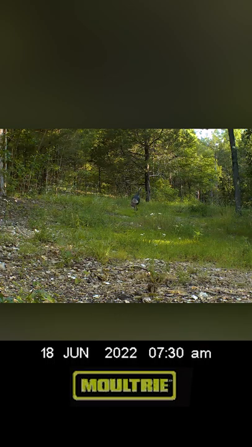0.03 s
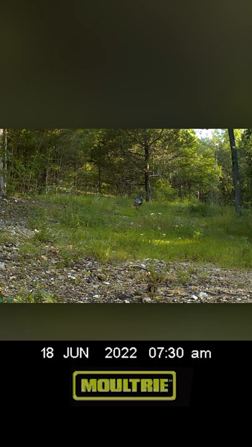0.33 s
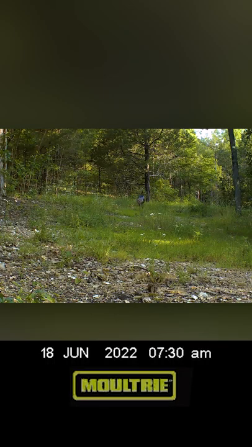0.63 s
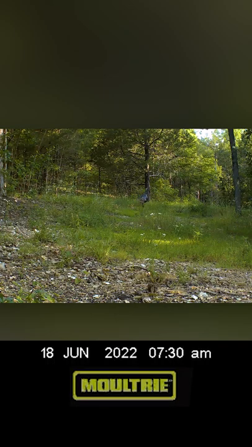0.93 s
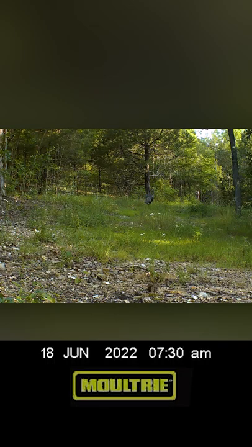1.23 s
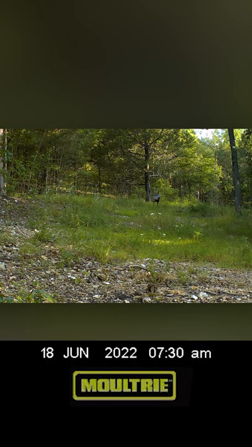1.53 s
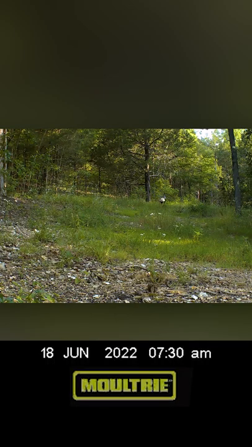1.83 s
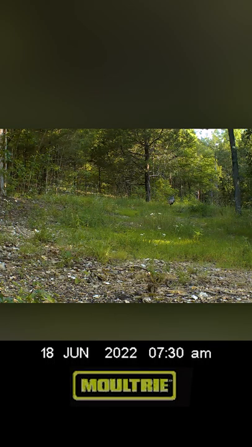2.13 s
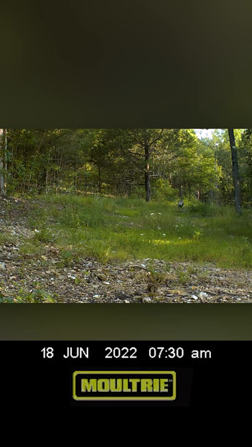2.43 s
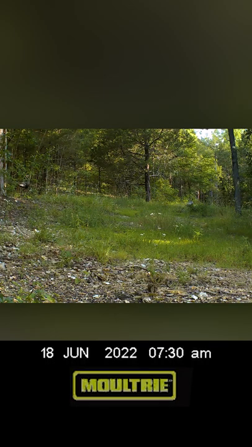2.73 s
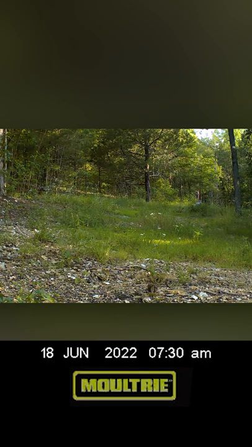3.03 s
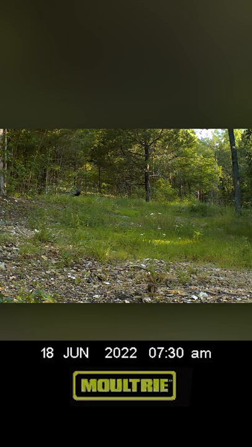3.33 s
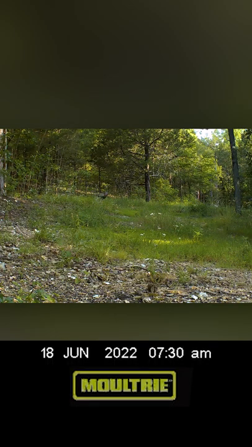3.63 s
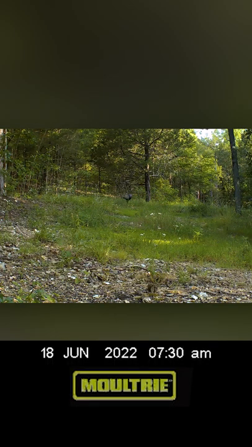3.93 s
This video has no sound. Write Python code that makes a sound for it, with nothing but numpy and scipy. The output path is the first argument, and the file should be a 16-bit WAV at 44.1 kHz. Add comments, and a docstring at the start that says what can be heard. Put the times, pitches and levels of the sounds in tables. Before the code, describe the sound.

Close, high cricket chirps repeat over faint birds, one falling whistle and a far thud.

```python
"""A cricket chirps close on the right of a morning forest clearing, scraping wing over wing in short runs.
Other crickets answer farther off, insects tick in bouts and a katydid's wings buzz thinly.
A bird on the left gives one long falling whistle that hangs in the trees; small birds slur and buzz.
One distant boom rolls back from the woods, over a faint far whine, a low drone and a bed of rumbling air."""
import sys
import numpy as np
from scipy import signal
from scipy.fft import rfft, irfft, next_fast_len
from scipy.io import wavfile
from scipy.ndimage import map_coordinates

SR = 44100
rng = np.random.default_rng(int(sys.argv[2]) if len(sys.argv) > 2 else 0)


def master(y):
    """Save y as 16-bit WAV."""
    cut = np.clip(np.atleast_2d(y).T, -1, 1)
    pcm = np.round(cut * 32767)  # scale
    wavfile.write(sys.argv[1], SR, pcm.astype(np.int16))


N = 176400

STROKE_GAP_S, RASP_RATE_HZ = .00854, 1200  # all crickets: stroke spacing, pace of the roughness


def near_cricket():
    """Ringing wings close on the right, with friction noise, a few scratches and short reflections."""
    # chirps (start [s], strokes [count], swell to full strength [strokes], level [dB])
    chirps = [(.2152, 7, 1, -26.3), (.5767, 8, 1, -24.1), (.9334, 7, 1, -24.5), (1.2588, 8, 2, -26.5),
              (1.573, 8, 1, -26.6), (1.9078, 8, 1, -25.3), (2.738, 7, 1, -25.4), (3.075, 8, 2, -26.2),
              (3.4325, 8, 1, -25.7), (3.7526, 8, 2, -25.2)]
    # the wings catch as a chirp ends (time [s], level [dB])
    scratches = [(.977, -58), (.985, -43), (2.787, -46)]
    # colour of the wing friction (frequency [Hz], level [dB])
    scrape = [(3000, -32), (6500, -25), (8000, 9), (9700, 9.5), (10700, -11), (11500, 1.5), (13000, -4),
              (15500, -23)]
    # a notch that dulls the ring on the left (frequency [Hz], gain [dB])
    left_notch = [(7000, 2), (7900, 1), (8500, -6), (9000, 0), (10000, 0)]
    song, scratch = np.zeros(N), np.zeros(N)
    for s, count, swell, db in chirps:
        add_chirp(song, s, int(round(count)), swell, db)
    for s, db in scratches:
        add(scratch, s, amp(db) * arch(clock(.008)))
    envelope = np.abs(signal.hilbert(song))
    friction = amp(-31 + 5.2 * wobble(150)) * envelope + scratch
    left, right = song * amp([[-19], [0]]) + amp(-18.5) * scatter(song, t60=.022)
    left = filtered(left, lambda hz: amp(along(left_notch, hz)))
    return np.array([left, right]) + friction * rush(scrape) * pan(db=-8.5) + amp(-33) * woods(song)


def add_chirp(track, s, count, swell, db):
    """A light touch of the wings, then a run of strokes that swells; softer strokes ring flat."""
    wing_hz, flat_hz_per_db = 8570, 42
    first_db, last_db = -5.5, -2
    touch = wing_stroke(wing_hz - 250, db - 13, stretch=.52)
    add(track, s - .0065, touch)
    for k in range(count):
        accent_db = first_db * max(0, 1 - k / swell) + last_db * (k == count - 1) + rng.normal(0, .6)
        stretch = np.clip(rng.normal(1, .11), .5, 2)
        start = s + k * STROKE_GAP_S + rng.normal(0, .00017)
        add(track, start, wing_stroke(wing_hz + flat_hz_per_db * accent_db, db + accent_db, stretch))


def wing_stroke(hz, db, stretch):
    """The scraper runs along the file: the wing rings cleanly, then sags and stutters as it slows."""
    # shape of one stroke (time [s], amplitude [share], pitch offset [Hz])
    shape = [(0, 0, 400), (.0005, .55, 170), (.0019, 1, 70), (.0035, .94, -40), (.0049, .6, -220),
             (.0058, .08, -440), (.0066, .26, -480), (.0081, .03, -400)]
    t = clock(shape[-1][0] * stretch)
    envelope, offset_hz = curves(shape, t / stretch)
    looseness = 1 + 3.5 * (t / t[-1]) ** 2
    slip_hz = 45 * looseness * wobble(RASP_RATE_HZ, len(t)) + rng.normal(0, 50)
    rasp = 1 + .05 * looseness * wobble(RASP_RATE_HZ, len(t))
    return amp(db) * envelope * rasp * tone(hz + offset_hz + slip_hz) / np.sqrt(2)


def far_crickets():
    """Far chirps arch in pitch and level, blurred by the grass; many more blend into a chorus."""
    # answering crickets (pitch [Hz], level [dB], chirp starts [s])
    crickets = [(9440, -58.5, [.24, .615, .975, 1.345, 1.67, 2.016, 2.515, 2.83, 3.24, 3.58, 3.945]),
                (9050, -60.5, [0.001, .34, 0.679, 1.04, 1.39, 1.725, 2.06, 2.43, 2.6, 3, 3.34, 3.835]),
                (8920, -61, [.1, .52, 1.08, 1.48, 1.81, 2.21, 2.32, 2.67, 3.53, 3.9])]
    chorus_gap_s, chorus_db, arch_hz = .05, -63, 260
    song, t = np.zeros(N), clock(.08)
    chirps = [(s, hz, db) for hz, db, starts in crickets for s in starts]
    for s in np.arange(0, N / SR, chorus_gap_s):
        chirps.append((s + rng.normal(0, chorus_gap_s / 2), rng.normal(8600, 260), chorus_db))
    for s, hz, db in chirps:
        strokes = 1 + .5 * np.cos(2 * np.pi * (t / STROKE_GAP_S + rng.random()))
        pitch = hz - arch_hz * (2 * t / t[-1] - 1) ** 2 + 170 * wobble(RASP_RATE_HZ / 2, len(t))
        add(song, s, amp(db + rng.normal(0, 1)) * arch(t) * strokes * tone(pitch))
    return scatter(song, t60=.016) * pan(db=-2.5)


def ticking_insects():
    """Insects repeat one short sagging note in bouts."""
    # bouts (start [s], end [s], tick spacing [s], pitch [Hz], level [dB], left over right [dB])
    bouts = [(0, .41, 0.057, 7720, -67, 0), (1.023, 1.17, .023, 7500, -65, -3),
             (1.439, 2.36, 0.059, 7690, -65, -1), (2.912, 4, .0535, 7618, -64.5, 0),
             (3.501, 3.905, 0.024, 7920, -59, -5)]
    song, t = np.zeros((2, N)), clock(.0225)
    sag_hz = 415 * (1.35 * t / t[-1] - .5) ** 2
    for start, end, spacing, hz, db, side_db in bouts:
        for s in np.arange(start, end, spacing):
            pitch = hz - sag_hz + 80 * wobble(680, len(t))
            onset = s + rng.normal(0, .002)
            tick = amp(db + rng.normal(0, 3.5)) * arch(t) ** 2 * tone(pitch)
            add(song, onset, tick * pan(side_db))
    return song + scatter(song.mean(0), t60=.066)


def katydid():
    """A very high, thin buzz: one sharp click for each wing closing and a softer scrape between."""
    # colour of the buzz (frequency [Hz], level [dB])
    spectrum = [(6000, -22), (11000, -20), (14500, 5), (15500, 9), (15900, -15)]
    # its swells and dips (time [s], relative level [dB])
    swells = [(0, -24), (.33, -8), (.55, 1), (.98, -1), (1.03, -20), (1.13, -19), (1.18, -7), (1.43, -10),
              (1.49, 0.5), (4, -0.5)]
    wing_rate_hz, click_s, backstroke = 46.8, .0035, .3
    swell_db, = curves(swells, np.arange(N) / SR)
    closings = np.cumsum(wing_rate_hz + .5 * wobble(3)) / SR
    since_closing = closings % 1 / wing_rate_hz
    wings = unit(backstroke + np.exp(-since_closing / click_s))
    return amp(-65.5 + swell_db + wobble(40)) * wings * rush(spectrum) * pan(db=-1.5)


def whistling_bird():
    """A whistle dives roughly, levels out to a pure tone, returns from the tree line and flutters away."""
    # contour of the whistle (time [s], pitch [Hz], level [dB])
    contour = [(.755, 6600, -72), (.78, 5580, -50), (0.796, 5190, -53), (0.799, 4960, -41),
               (0.82, 4580, -38), (0.85, 4470, -39), (.864, 4460, -58), (0.878, 4350, -38),
               (0.889, 4310, -52), (0.923, 4235, -40.5), (0.965, 4166, -34.5), (1.004, 4075, -35.5),
               (1.069, 4090, -37.5), (1.088, 4102, -47)]
    tree_line_s, flutter_db = .35, 2
    t = np.arange(N) / SR
    hz, db = curves(contour, t)
    height_hz = np.abs(hz - hz[-1])
    hz = hz + (7 + .057 * height_hz) * wobble(400)  # roughest at the top of the dive
    envelope = amp(db + .94 * wobble(70.1)) * gate(contour, t, fade_s=.0024)
    song = envelope * (tone(hz) + amp(-26) * tone(2 * hz) + amp(-32) * tone(3 * hz))
    send_db = np.minimum(height_hz / 100, 3)
    blurred = envelope * amp(send_db) * tone(hz + 60 * wobble(600))  # the foliage blurs the echo
    echo = amp(-18) * woods(blurred)
    add(echo, tree_line_s, amp(-20.5) * scatter(blurred, t60=.2))
    return song * pan(db=8) + echo * amp(flutter_db * wobble(35))


def small_birds():
    """Hoarse slurs that round over and fall, thin far notes and buzzy calls, echoing in the trees."""
    # slurs (start [s], length [s], top [Hz], end [Hz], level [dB], left over right [dB])
    slur_calls = [(0.058, 0.048, 3980, 3440, -61.5, 8), (0.147, 0.031, 3750, 2660, -61.5, 3),
                  (0.195, 0.062, 5230, 3080, -54, 10), (0.318, 0.046, 4600, 3050, -56.5, 11),
                  (1.119, 0.029, 4000, 3370, -64, 21), (1.256, 0.077, 5200, 3056, -56, 10),
                  (1.399, 0.045, 4150, 2924, -59.5, 8), (2.15, 0.046, 4120, 2550, -56.5, 1),
                  (2.666, .035, 4360, 3620, -58, 6), (2.769, 0.081, 4130, 2940, -56.5, 8),
                  (2.915, 0.084, 4200, 2910, -58.5, 10), (3.263, 0.045, 4190, 2430, -55, 3),
                  (3.3, 0.029, 3200, 2310, -57, 1)]
    # pitch path at even steps through a slur (fall [share])
    slur_fall = [0.044, 0, 0.15, 0.43, .73, 1]
    # thin far notes (start [s], length [s], start pitch [Hz], end pitch [Hz], level [dB])
    far_notes = [(2.08, 0.2, 2540, 2500, -65), (3.626, 0.0093, 2507, 1880, -56.5)]
    # buzzy calls (start [s], length [s], start pitch [Hz], end pitch [Hz], level [dB])
    buzz_calls = [(1.235, .028, 6000, 6180, -61), (1.33, 0.078, 6400, 5950, -55),
                  (1.385, 0.07, 6050, 5400, -59)]
    buzz_rate_hz, buzz_swing_hz = 100, 270
    slurs, notes, buzzes = np.zeros((2, N)), np.zeros(N), np.zeros(N)
    for s, length, top, end, db, side_db in slur_calls:
        t = clock(length)
        step = t / t[-1] * (len(slur_fall) - 1)
        fall = map_coordinates(np.array(slur_fall, float), [step], mode="nearest")
        pitch = top + (end - top) * fall + 85 * wobble(700, len(t))
        envelope = amp(db + 2.2 * wobble(350, len(t))) * arch(t)
        add(slurs, s, envelope * tone(pitch) * pan(side_db))
    for s, length, start, end, db in far_notes:
        t = clock(length)
        pitch = np.linspace(start, end, len(t)) + 25 * wobble(148.9, len(t))
        add(notes, s, amp(db) * arch(t) * tone(pitch))
    for s, length, start, end, db in buzz_calls:
        t = clock(length)
        swing = buzz_swing_hz * (np.sin(2 * np.pi * buzz_rate_hz * t) + .54 * wobble(594, len(t)))
        add(buzzes, s, amp(db) * arch(t) * tone(np.linspace(start, end, len(t)) + swing))
    calls = slurs + amp(-10) * scatter(slurs.mean(0), t60=.24) + notes * pan(db=15)
    calls += (amp(1) * buzzes + scatter(buzzes, t60=.06)) * pan(db=9)
    return calls + amp(-11.5) * woods(slurs.mean(0) + notes + buzzes)


def boom():
    """A distant low thud with a hollow ring, then its rolling returns from the woods."""
    # hollow ring of the thud (pitch [Hz], level [dB], t60 [s])
    modes = [(200, -38.5, 0.782), (255, -44, 1)]
    # rolling returns (start [s], level [dB], rise [s], t60 [s])
    returns = [(2.18, -41.5, 0.023, 2.93), (2.68, -46, 0.13, 4.66)]
    # colour of the roll (frequency [Hz], level [dB])
    spectrum = [(40, -14), (110, -6.5), (210, 6), (320, -6.5), (600, -3), (900, -19), (1500, -25),
                (9000, -62)]
    start_s, thud_hz = 2.168, 39.9
    thud, t = np.zeros(N), clock(.092)
    add(thud, start_s, amp(-23.5) * np.sin(np.pi * t / t[-1]) * np.sin(2 * np.pi * thud_hz * t))
    t = np.arange(N) / SR
    age = np.maximum(t - start_s, 0)
    attack = 1 - np.exp(-age / .03)
    ring = attack * sum(amp(db - 60 * age / t60) * tone(hz + 5 * wobble(50)) for hz, db, t60 in modes)
    power = np.zeros(N)
    for s, db, rise, t60 in returns:
        decay = amp(db - 60 * np.maximum(t - s - rise, 0) / t60)
        power += (decay * np.clip((t - s) / rise, 0, 1)) ** 2
    roll = np.sqrt(power) * amp(1.2 * wobble(17)) * rush(spectrum)
    return thud * pan(db=7) + ring + roll * pan(db=-2.5)


def low_drone():
    """A deep wavering hum, left of centre."""
    # contour of the drone (time [s], pitch [Hz], level [dB])
    contour = [(0, 54.4, -34.5), (.42, 57.56, -40), (.9, 58.07, -39.5), (1.1, 68.05, -36),
               (1.33, 69.1, -37.5), (1.52, 61.9, -53), (1.75, 70.7, -37.5), (2.2, 62.02, -51),
               (2.7, 68.9, -40.5), (3.1, 67.96, -39), (3.35, 64.1, -45.5), (3.5, 56.1, -36.5),
               (3.65, 57.66, -46.5), (4, 61.9, -40)]
    hz, db = curves(contour, np.arange(N) / SR)
    return amp(db + .9 * wobble(14)) * tone(hz + 4 * wobble(25.16)) * pan(db=5.5)


def far_whine():
    """A faint tone glides down and up again, washed in the echo of the woods."""
    # contour of the whine (time [s], pitch [Hz], level [dB])
    contour = [(.7, 876, -70), (0.979, 770.8, -61.5), (1.42, 769.4, -65), (1.621, 750.6, -69),
               (2.05, 950, -65.5)]
    t = np.arange(N) / SR
    hz, db = curves(contour, t)
    whine = amp(db) * gate(contour, t, fade_s=.022) * tone(hz + 12 * wobble(50))
    return amp(2) * whine + amp(-.5) * woods(whine)


def air():
    """The bed: a low rumble and the soft rush of the woods, both gently swelling."""
    # colour of the rumble (frequency [Hz], level [dB])
    rumble_spectrum = [(15, 3.5), (30, -4.5), (52, -0.5), (80, -2.5), (115, -5.5), (160, -13), (600, -49.5)]
    # colour of the rush (frequency [Hz], level [dB])
    rush_spectrum = [(88, -64), (150, -5), (270, -9), (520, -13), (870, -14.5), (1150, -18.5),
                     (1600, -23.5), (2900, -27.5), (4000, -30.5), (6900, -36), (8200, -21.5), (10000, -50),
                     (15800, -90)]
    rumble = amp(-36.5 + .87 * wobble(6.29)) * rush(rumble_spectrum) * pan(db=2)
    return rumble + amp(-51.5 + .5 * wobble(2.49)) * rush(rush_spectrum) * pan(db=2.5)


def woods(x):
    """The long reverb of the trees, lingering most in the birds' range."""
    # decay of the woods (frequency [Hz], t60 [s])
    decay_times = [(300, 0.92), (4000, 2.5), (6500, 1.1), (15000, 0.36)]
    hz, t, noise = signal.stft(rng.standard_normal((2, 2 * SR)), SR, nperseg=256)
    decay = amp(-60 * t / along(decay_times, hz)[:, None])
    build_up = 1 - np.exp(-t / .017)
    tail = signal.istft(noise * decay * build_up, SR, nperseg=256)[1]
    return spread(reverberate(x, tail))


def scatter(x, t60):
    """Quick reflections from stones and grass, different on each side."""
    t = clock(.15)
    return reverberate(x, rng.standard_normal((2, len(t))) * amp(-60 * t / t60))


def reverberate(x, tail):
    """A mono sound through a stereo tail scaled to about unit energy."""
    return signal.fftconvolve(x[None], tail / np.linalg.norm(tail[0]), axes=1)[:, :N]


def rush(spectrum):
    """Diffuse stereo noise of rms 1."""
    noise = filtered(rng.standard_normal((2, N)), lambda hz: amp(along(spectrum, hz)))
    return unit(spread(noise))


def spread(pair):
    """Two unrelated signals become a diffuse field, narrow in the bass and wide in the treble."""
    # likeness of left and right (frequency [Hz], correlation [0-1])
    likeness = [(60, 0.69), (200, 0.8), (600, 0.72), (1300, 0.42), (4000, 0.57), (8000, 0.36),
                (15000, 0.042)]
    angle = lambda hz: np.arccos(np.clip(along(likeness, hz), -1, 1)) / 2
    mid, side = filtered(pair, lambda hz: np.array([np.cos(angle(hz)), np.sin(angle(hz))]))
    return np.array([mid + side, mid - side])


def filtered(x, response):
    """x shaped by a frequency response."""
    size = next_fast_len(N + SR // 2)
    return irfft(rfft(x, size) * response(np.fft.rfftfreq(size, 1 / SR)), size)[..., :N]


def tone(hz):
    """A sine of rms 1 that follows a pitch curve."""
    return np.sqrt(2) * np.sin(2 * np.pi * np.cumsum(hz) / SR)


def wobble(rate, size=N):
    """A smooth random curve, rate knots a second."""
    knots = rng.standard_normal(int(size * rate / SR) + 4)
    return map_coordinates(knots, [np.arange(size) * rate / SR])


def arch(t):
    """A soft swell and fade over the span of t."""
    edges = np.minimum(1, np.minimum(t, t[-1] - t) / t[-1] * 10)
    return np.sqrt(np.abs(np.sin(np.pi * t / t[-1]))) * edges


def gate(rows, t, fade_s):
    """Fades in from the first row's time and out by the last."""
    return np.clip(np.minimum(t - rows[0][0], rows[-1][0] - t) / fade_s, 0, 1)


def curves(rows, t):
    """Each column after the time, at the times t."""
    times, *columns = np.transpose(rows)
    return [np.interp(t, times, column) for column in columns]


def along(points, hz):
    """(frequency [Hz], value) points joined on a log axis."""
    freqs, values = np.transpose(points)
    return np.interp(np.log(hz + 1), np.log(freqs + 1), values)


def add(track, s, x):
    """Mix x in at s seconds."""
    i = int(np.clip(round(s * SR), 0, N))
    track[..., i:i + x.shape[-1]] += x[..., :N - i]


def pan(db):
    """Stereo gains, left over right by db."""
    return amp(np.array([[db], [-db]]) / 2)


def amp(db):
    return 10 ** (np.asarray(db) / 20)


def unit(x):
    return x / np.sqrt(np.mean(x ** 2) + 1e-20)


def clock(length):
    return np.arange(int(length * SR)) / SR


def scene():
    """Insects and birds over the far sounds of the forest."""
    insects = near_cricket() + far_crickets() + ticking_insects() + katydid()
    birds = whistling_bird() + small_birds()
    return insects + birds + low_drone() + far_whine() + boom() + air()


def record(dry):
    """A brick-wall cut takes off the very top of the treble."""
    return filtered(dry, lambda hz: hz < 15850)


dry = scene()
out = record(dry)
master(out)
```